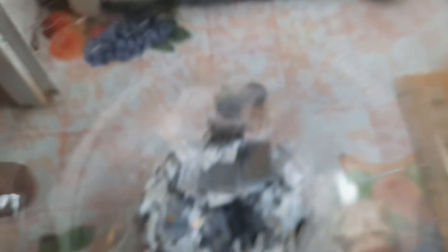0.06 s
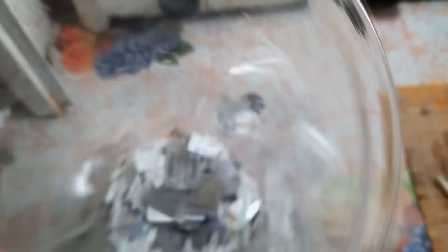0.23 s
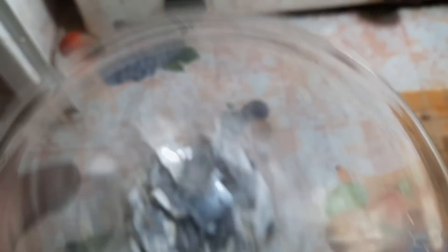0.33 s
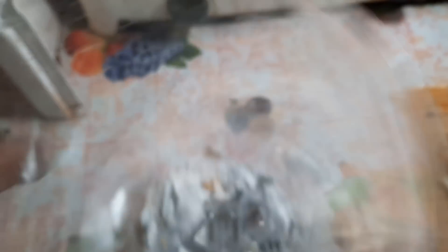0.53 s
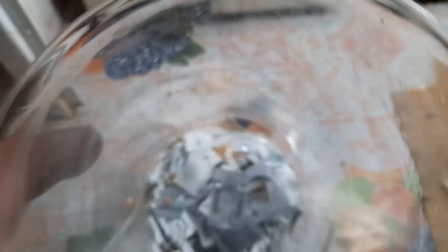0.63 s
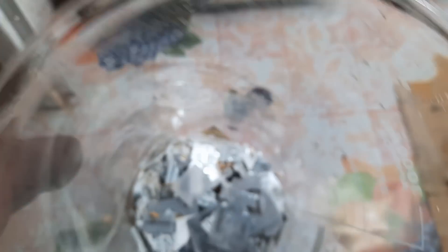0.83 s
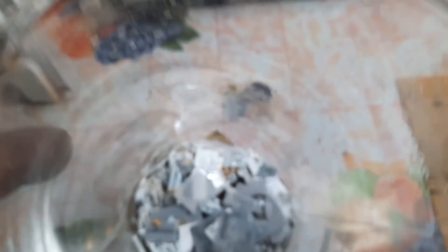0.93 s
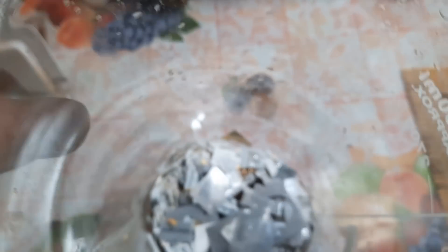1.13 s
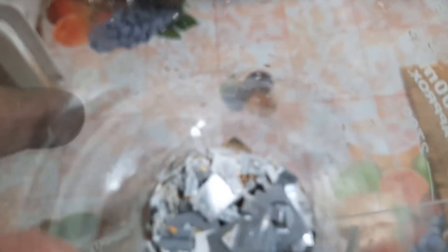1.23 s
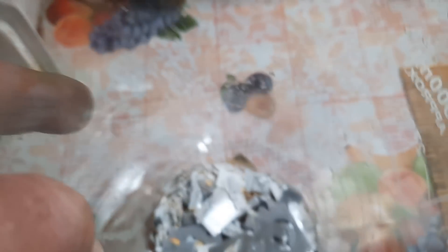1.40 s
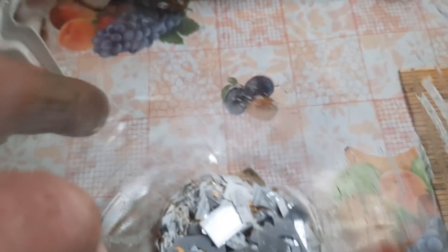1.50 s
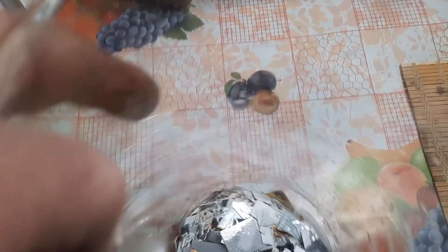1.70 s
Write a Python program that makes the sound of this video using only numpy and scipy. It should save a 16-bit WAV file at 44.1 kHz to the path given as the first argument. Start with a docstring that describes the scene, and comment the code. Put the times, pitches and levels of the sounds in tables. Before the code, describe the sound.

Hard ceramic flakes rattle loudly as a glass bowl is swirled, scraping and clinking against its wall. They quickly stop, and the bowl settles on a table with soft bumps and a few ticks, heard close in a quiet room.

```python
"""Ceramic flakes swirled in a glass bowl

The flakes tick against each other, scrape along the wall and slap the glass in clumps, so it rings
briefly. Large flakes clink, rubbing makes the glass sing, and the moving bowl hums. The hand bumps
the bowl and the table softly, mostly as the bowl comes to rest with a few ticks in a quiet room."""
import sys
import numpy as np
from scipy import signal
from scipy.fft import rfft, irfft, next_fast_len
from scipy.io import wavfile

SR = 44100
rng = np.random.default_rng(int(sys.argv[2]) if len(sys.argv) > 2 else 0)


def persist_wave(psi):
    """Save psi, clipped to +-1, as 16-bit WAV."""
    counts = np.round(np.clip(psi, -1, 1) * 32767).astype(np.int16)
    wavfile.write(sys.argv[1], SR, np.atleast_2d(counts).T)


N = 77175
T = np.arange(N) / SR

# Levels in tables are relative. A ring time (T60) is how long a sound takes to fade by 60 dB.
# The swirl. Each row: time in seconds, rattle level in dB, scraping level in dB.
SWIRL_LEVELS = [(.13, -98, -88), (.175, -57.5, -59.5), (.205, -32, -46.5), (.265, -18, -32),
                (.335, -22.5, -38), (.355, -26, -35.5), (.368, -16, -25.5), (.412, -24, -32),
                (.432, -27, -44.5), (.468, -31.5, -37), (.51, -21, -35.5), (.555, -24, -40.5),
                (.585, -23, -53), (.618, -26.5, -37.5), (.642, -35.5, -38.5), (.675, -26.5, -36),
                (.708, -26.5, -38.5), (.738, -31, -39.5), (.77, -29, -36), (.803, -26.5, -38),
                (.825, -33.5, -40), (.87, -43.5, -49.5), (.93, -76, -104)]
# Clumps hitting the glass. Each row: start in seconds, level in dB, left over right in dB,
# scatter in seconds, glass ring in dB, treble tilt in dB per octave.
CLUMP_HITS = [(0.073, -23.5, 0.5, 0.0054, -10.5, -2.5), (.092, -27.5, -8.5, 0.0066, -14.5, 0),
              (.189, -24, 2.5, 0.003, -13.5, 1), (0.2159, -14, 3.5, 0.0015, -8, 0.5),
              (0.2908, 8.5, 0.5, 0.0031, -15, 1), (0.334, -3, 3, 0.0027, -13.5, 0.5),
              (.3615, -3.5, -6, 0.011, -15.5, 12), (0.3985, 3, -9.5, 0.001, -8, -0.5),
              (0.4135, -6, 3, 0.0046, -10, 7.5), (0.523, -5.5, 10.5, 0.0059, -18, 8),
              (.5907, 1, -5, 0.00095, -4.5, -0.5), (.599, -7.5, -2, 0.0048, 5, -0.5),
              (0.8097, 1.5, -2, 0.0057, -7, 0.5), (0.8477, -0.5, 8, 0.0012, -8.5, -1),
              (.852, -4.5, -7, 0.0038, -23.5, 1)]
# Large flakes striking. Each row: start in seconds, level in dB, pitch in Hz.
CLINK_HITS = [(0.265, -5, 5640), (.292, 9, 6070), (.3987, 8.5, 5835), (0.575, -5.5, 6500),
              (0.5911, 4, 5946), (0.621, -1.5, 6530), (0.8109, -1, 6320)]
# A large flake's tones. Each row: multiple of its pitch, level in dB, ring time in seconds.
LARGE_FLAKE_MODES = [(.88, -2, .024), (1, 0, .022), (1.08, -1, .024)]
# Rubs on the glass. Each row: start in seconds, level in dB, length in seconds.
GLASS_RUBS = [(.145, -57, .04), (.3, -39.5, .055), (.594, -40, .035)]
# The hand's bumps. Each row: start in seconds, boom in dB, push length in seconds, knock in dB.
HAND_BUMPS = [(.405, -29, 0.0029, -16.5), (0.426, -22, 0.0075, -36), (0.515, -37, 0.0028, -33),
              (0.958, -17, 0.0072, -42), (.982, -16, 0.0089, -43.5), (1.069, -12, 0.0073, -25.5),
              (1.087, -21, 0.003, -21.5), (1.241, -18, 0.0056, -31), (1.334, -23.5, 0.0049, -37),
              (1.39, -33.5, 0.0058, -41.5), (1.515, -38, 0.006, -48.5), (1.716, -26.5, 0.01, -55)]
# The bowl's ticks. Each row: start in seconds, level in dB, centre in Hz, width to each side in
# octaves, ring time in seconds.
SETTLING_TICKS = [(1.027, -36, 12450, 0.29, 0.02), (1.068, -23.5, 2560, 4.6, 0.078),
                  (1.073, -25.5, 1242, 1.3, 0.13), (1.679, -38.5, 400, 0.74, 0.069)]

# Modes are the tones a thing rings with. Each row: pitch in Hz, level in dB, ring time in seconds.
GLASS_MODES = [(1545, -15, .12), (2030, -7, .06), (2110, -7, .08), (2570, -5, .07), (3345, -1, .08),
               (4610, -7, .07), (5286, -5, .05), (5580, -3, .05), (5860, -6, .045), (6235, -4, .04),
               (7225, -8, .04), (8450, -10, .03), (12340, -6, .04)]
SCRAPE_MODES = [(663, -22.5, 0.054), (795, -13.5, 0.021), (1535, -18, 0.05), (3692, 2, 0.0061)]
TABLE_MODES = [(69, -1, 0.45), (120, 2.5, 0.28), (205, 0, 0.12)]

# How the bowl's hum and the room noise rise and fall. Each row: time in seconds, level in dB.
HUM_LEVELS = [(0, -79.5), (.15, -79.5), (.19, -50.5), (.23, -56), (.27, -65), (.305, -50), (.35, -58),
              (.6, -73), (.7, -57.5), (.77, -77), (1.67, -87.5), (1.685, -60), (1.75, -67)]
ROOM_NOISE_LEVELS = [(0, -78), (.12, -61), (.9, -66), (1.2, -74.5), (1.45, -73.5), (1.475, -67),
                     (1.69, -65), (1.74, -55.5)]

# Tone colours, which shape bass and treble. Each row: frequency in Hz, boost or cut in dB.
CONTACT_COLOUR = [(60, -27), (400, -26), (750, -18), (1150, -18), (1600, -8), (2500, -2), (4000, -.5),
                  (6200, 0), (8200, 0), (9700, -2.5), (12800, 1), (15500, -4)]  # a flake touching something
CLACK_COLOUR = [(1000, 1), (2100, 0), (3500, -1), (5700, -4.5), (8000, 2.5), (13000, -3)]  # the larger flakes in a clump
SCRAPE_COLOUR = [(150, -16), (420, -10), (680, 0.5), (5000, 0), (12000, -9.5)]  # how the scraping passes into the air
KNOCK_COLOUR = [(60, -1.5), (200, -5.5), (310, 4.5), (400, -18), (480, -2), (700, -20), (1200, -31),
                (3000, -40.5), (9000, -66)]  # the bowl's foot
ROOM_NOISE_COLOUR = [(30, -6.5), (70, 6.5), (150, 0), (300, -4), (600, -16), (1100, -29.5), (1900, -21),
                     (2450, -18.5), (3200, -34), (4400, -30.5), (5400, -20), (9500, -34.5), (12800, -24.5),
                     (15500, -37)]
RIGHT_MIC_COLOUR = [(120, 1), (300, -2), (900, -7), (1600, -1), (2150, 3), (2900, -7), (3600, -3),
                    (4500, 1), (5300, 6), (6300, 5.5), (7200, -3), (8200, -13), (9500, -21), (10800, -14.5),
                    (12200, -4), (13300, -3.5), (15000, -5)]


def rattle():
    """Flakes tumble over each other and keep the glass ringing faintly."""
    clicks = contacts(per_s=3300, spread_db=2.5) * level_curve(SWIRL_LEVELS)
    return flakes(clicks) + gain(-16.5) * through(clicks, ring(GLASS_MODES))


def flakes(clicks, count=32, low_hz=2800, high_hz=15000, t60=.017):
    """Each click strikes one of many flakes: a sharp tick and that flake's own brief ring."""
    struck, out = rng.integers(0, count, N), 0
    for flake in range(count):
        modes = [(hz, 0, t60) for hz in rng.uniform(low_hz, high_hz, size=5)]
        response = gain(-1) * ring(modes)
        response[[0, 1], rng.integers(0, 14, size=2)] += 1  # the tick, with its own delay on each side
        out = out + through(clicks * (struck == flake), unit(response))
    return out


def clumps(follow_db=6, glass_rise_s=.003):
    """One flake hits the wall, the rest of its clump follows within milliseconds, and the glass rings."""
    out = 0
    for start, db, pan_db, scatter, ring_db, tilt_db in CLUMP_HITS:
        first = np.zeros(N)
        first[int(start * SR)] = 1
        landing = (T >= start) * (T < start + scatter + .001)
        followers = unit(np.array([contacts(per_s=16000, spread_db=3) for side in range(2)]) * landing)
        modes = detuned(GLASS_MODES, share=.007)  # flakes lying on the glass shift its tones
        glass = unit(ring(modes, phase_spread=.22) * (1 - np.exp(-T / glass_rise_s)))
        hit = unit(first + gain(follow_db) * followers) + gain(ring_db) * through(first, glass)
        hit = colour(hit, [(1500, -2 * tilt_db), (6000, 0), (16000, np.sqrt(2) * tilt_db)])
        out = out + hit * gain(db) * pan(pan_db)
    return colour(out, CLACK_COLOUR)


def clinks(bounce_s=.0035, bounce_db=-9.5):
    """A large flake strikes, bounces once and rings with a few close tones."""
    out = 0
    for start, db, hz in CLINK_HITS:
        strikes = np.zeros(N)
        strikes[int(start * SR)] = 1
        strikes[int((start + bounce_s) * SR)] = gain(bounce_db)
        modes = [(hz * ratio, level, t60) for ratio, level, t60 in LARGE_FLAKE_MODES]
        out = out + gain(db) * unit(through(strikes, ring(modes)))
    return out


def scraping():
    """Flakes stick and slip along the wall, whose hollow tones shift as they slide."""
    slips = contacts(per_s=520, spread_db=2.3) * level_curve(SWIRL_LEVELS, column=2)
    wall = moving(slips, lambda: ring(detuned(SCRAPE_MODES, share=.04)))
    return colour(wall, SCRAPE_COLOUR)


def singing():
    """Rubbing keeps one tone of the glass going for a moment."""
    swell = sum(gain(db) * arch(start, length) for start, db, length in GLASS_RUBS)
    return wavering_tone(hz=2110, depth=.014) * swell


def bumps(knock_t60=.2, knock_rise_s=.0049):
    """Soft pushes set the table booming; the bowl's foot adds a dull knock."""
    booms, knocks = 0, 0
    for start, db, length, knock_db in HAND_BUMPS:
        push = arch(start, length) ** 2
        modes = detuned(TABLE_MODES, share=.035)  # the hand's grip shifts the table's tones
        booms = booms + gain(db) * through(push / push.sum(), ring(modes, phase_spread=0)[0])
        rise = np.clip((T - start) / knock_rise_s, 0, 1)
        knocks = knocks + gain(knock_db) * dying_noise(knock_t60, start)[0] * rise
    return gain(10) * booms + gain(25) * colour(knocks, KNOCK_COLOUR)


def ticks():
    """The bowl settles and the fingers let go: each light click is a short burst of noise."""
    out, grid_hz = 0, np.geomspace(50, 20000, 40)
    for start, db, hz, octaves, t60 in SETTLING_TICKS:
        band_db = np.maximum(-6 * (np.log2(grid_hz / hz) / octaves) ** 2, -40)
        tick = colour(dying_noise(t60, start), np.c_[grid_hz, band_db])
        out = out + gain(db + 6.5) * unit(tick)
    return out


def hum():
    """The moving bowl hums on one low, wavering note, a little to the left."""
    return wavering_tone(hz=279, depth=.028) * level_curve(HUM_LEVELS) * pan(8.5)


def room_noise():
    """The room gives a faint noise, much alike on both sides in the bass."""
    separate = colour(rng.standard_normal((2, N)), [(100, -10), (800, 8)])
    shared = colour(rng.standard_normal(N), [(200, -7.5), (1500, -10.5)])
    noise = unit(colour(separate + shared, ROOM_NOISE_COLOUR)) * np.sqrt(N)
    return noise * level_curve(ROOM_NOISE_LEVELS)


def contacts(per_s, spread_db):
    """Make random clicks, mostly small and a few large, with an average power of one."""
    sizes = gain(spread_db * np.minimum(rng.exponential(size=N), 4))
    touches = rng.random(N) < per_s / SR
    return unit(touches * sizes * rng.choice([-1, 1], N)) * np.sqrt(N)


def ring(modes, phase_spread=np.pi):
    """Add up fading tones; each reaches the two microphones at a random point in its wave."""
    phases = phase_spread * rng.uniform(-1.05, 1, (len(modes), 2, 1))
    out = np.zeros((2, N))
    for (hz, db, t60), phase in zip(modes, phases):
        t = T[:int(SR * t60 * 2) + 1]
        out[:, :len(t)] += gain(db) * np.sin(2 * np.pi * hz * t + phase) * gain(-60 * t / t60)
    return unit(out)


def detuned(modes, share):
    """Move each tone at random by roughly this share of its pitch."""
    return [(hz * (1 + share * rng.standard_normal()), db, t60) for hz, db, t60 in modes]


def wavering_tone(hz, depth, turns_per_s=110):
    """Make a pure tone whose pitch wanders a little."""
    times = np.arange(0, T[-1] + 1, 1 / turns_per_s)
    drift = np.interp(T, times, rng.standard_normal(N)[:len(times)])
    return np.sqrt(2) * np.sin(2 * np.pi * np.cumsum(hz * (1 + depth * drift)) / SR)


def dying_noise(t60, start=0):
    """Make noise that fades like a crowd of echoes, unrelated left and right."""
    fade = (T >= start) * gain(-60 * np.maximum(T - start, 0) / t60)
    return unit(rng.standard_normal((2, N)) * fade)


def moving(x, new_response, move_s=.035, size=4096):
    """Blend from one response to the next as the flakes reach new places in the bowl."""
    hop = int(move_s * SR)
    window = np.sin(np.pi * np.arange(2 * hop) / (2 * hop))
    x = np.pad(np.atleast_2d(x), ((0, 0), (0, 2 * hop)))
    out = np.zeros((2, N + 2 * hop + size))
    for i in range(0, N, hop):
        part = signal.fftconvolve(x[:, i:i + 2 * hop] * window, new_response()[:, :size], axes=1)
        out[:, i:i + part.shape[1]] += part
    return out[:, :N]


def through(x, response):
    """Play a sound through a response: the sound a thing makes after a single click."""
    size = next_fast_len(2 * N)
    return irfft(rfft(x, size) * rfft(response, size), size)[..., :N]


def colour(x, points, size=2048):
    """Filter a sound with a tone colour given as (Hz, dB) points."""
    hz, db = np.array(points).T
    log_hz = np.log(np.fft.rfftfreq(size, 1 / SR) + 1)
    log_gain = np.log(gain(np.interp(log_hz, np.log(hz), db)))
    cepstrum = irfft(log_gain)[:size // 2]  # keeping one half stops the filter ringing ahead of a hit
    cepstrum[1:] *= 2
    return through(x, irfft(np.exp(rfft(cepstrum, size))))


def level_curve(rows, column=1):
    """Join a table's dB levels into a gain over time."""
    rows = np.array(rows)
    return gain(np.interp(T, rows[:, 0], rows[:, column]))


def arch(start, length):
    """Rise from zero to one and fall back, once."""
    return np.sin(np.pi * np.clip((T - start) / length, 0, 1))


def pan(db):
    """Give gains that make the left side this many dB louder than the right."""
    return gain([[db / 2], [-db / 2]])


def gain(db):
    """Turn decibels into a number to multiply by."""
    return 10 ** (np.asarray(db) / 20)


def unit(x):
    """Scale each channel to a total energy of one."""
    return x / np.sqrt(np.sum(x ** 2, axis=-1, keepdims=True) + 1e-18)


def scene():
    """The flakes echo inside the bowl as they move, and the bowl's sound echoes in the room."""
    impacts = colour(rattle() + gain(8.5) * clumps(), CONTACT_COLOUR)
    inside = impacts + clinks() + scraping() + singing()
    bowl_echo = gain(-1) * moving(inside, lambda: dying_noise(t60=.048))
    bowl = gain(-2.5) * (inside + bowl_echo) + ticks()
    room_echo = gain(-28.5) * through(bowl, dying_noise(t60=.28))
    return bowl + room_echo + hum() + bumps() + room_noise()


def record(dry, low_hz=60, top_hz=15850):
    """The right microphone's opening colours the sound; deep bass is cut, peaks clip, the top is cut."""
    mics = np.array([dry[0], colour(dry[1], RIGHT_MIC_COLOUR)])
    bass_cut = signal.butter(2, low_hz, "high", fs=SR, output="sos")
    top_cut = signal.ellip(10, .2, 80, top_hz, fs=SR, output="sos")
    clipped = np.clip(signal.sosfilt(bass_cut, mics), -1, 1)
    return signal.sosfilt(top_cut, clipped)


dry = scene()
out = record(dry)
persist_wave(out)
```